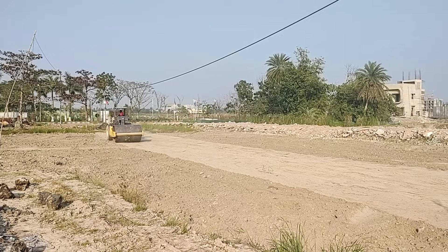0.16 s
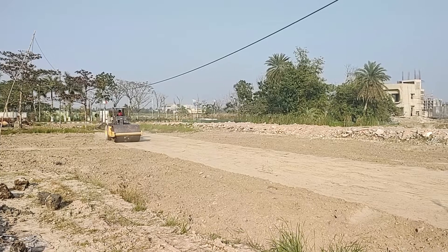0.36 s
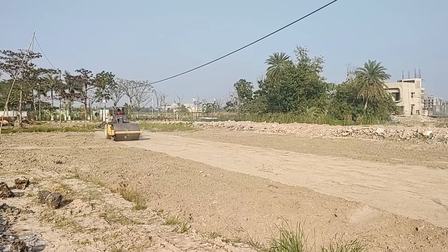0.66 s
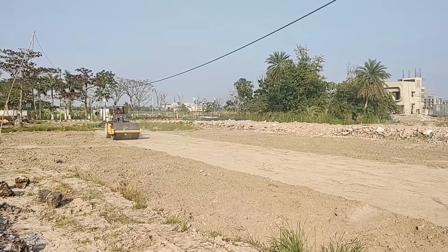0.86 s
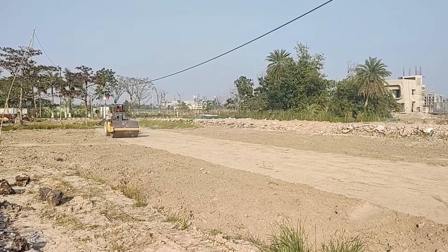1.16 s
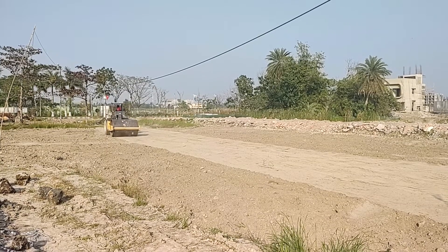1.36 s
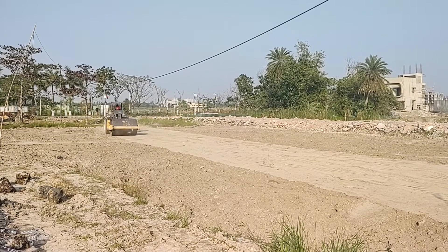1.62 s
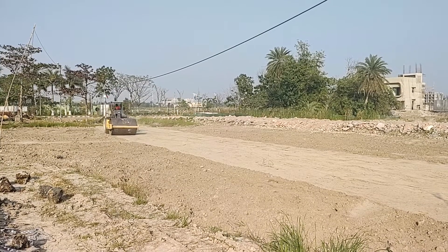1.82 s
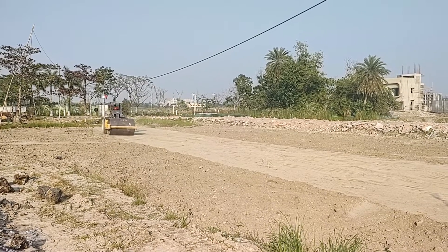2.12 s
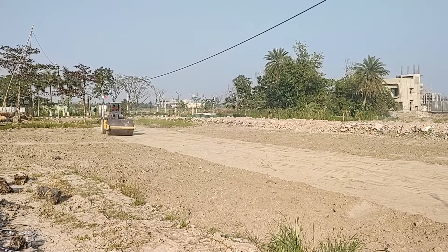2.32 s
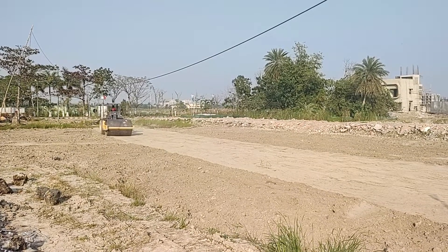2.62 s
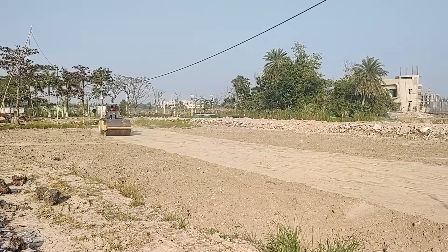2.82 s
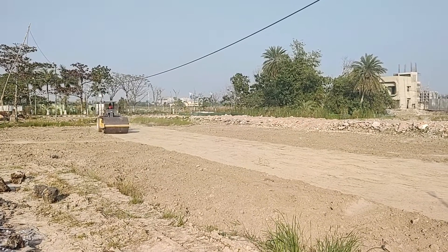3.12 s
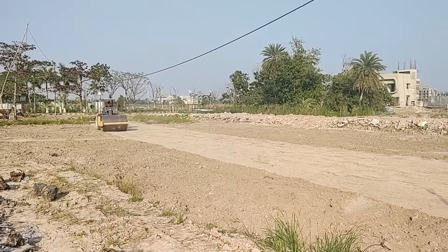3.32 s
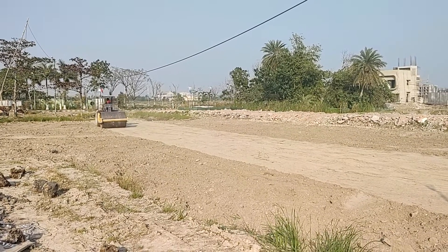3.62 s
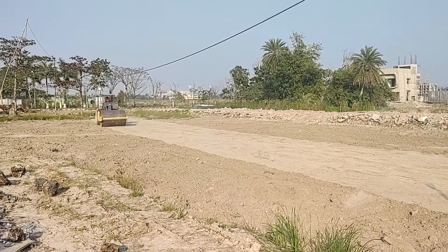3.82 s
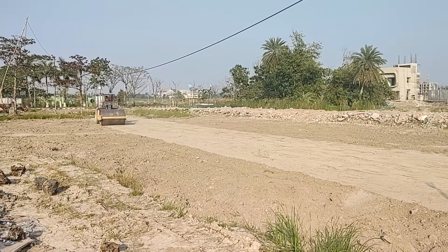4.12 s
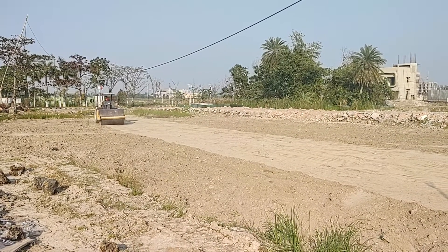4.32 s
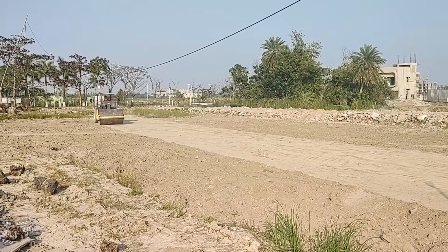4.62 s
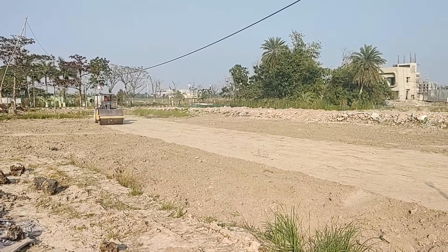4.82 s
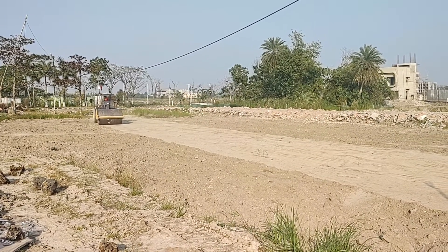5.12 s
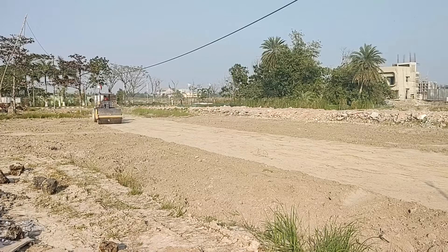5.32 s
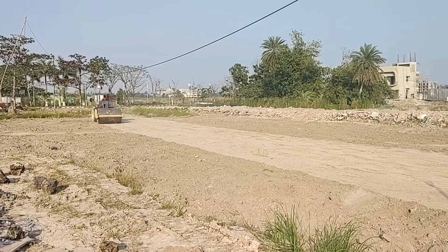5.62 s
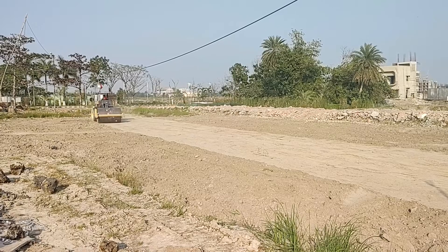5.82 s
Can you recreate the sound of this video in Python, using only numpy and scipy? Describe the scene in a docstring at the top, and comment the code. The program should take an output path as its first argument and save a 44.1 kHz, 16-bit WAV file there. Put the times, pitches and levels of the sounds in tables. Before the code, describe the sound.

A distant diesel road roller drones steadily on open ground, its low hum swelling and fading, with soft wind thumps and one dull metal clank.

```python
"""On open ground, some way off, a six-cylinder diesel road roller works at a nearly steady speed.
Its firing note, a sine at six pulses a cycle, swells and fades over a drone of the other cycle partials.
Filtered noise gives block knock and rattle in step with the cylinders, and fan hiss.
A metal clank of three blows rings in decaying modes with a noise crash.
Light wind rumbles as filtered noise and thumps as short swings, over a faint noise bed of open land."""
import sys
import numpy as np
from scipy import signal
from scipy.fft import rfft, irfft, next_fast_len
from scipy.io import wavfile
from scipy.ndimage import uniform_filter1d

SR = 44100
rng = np.random.default_rng(int(sys.argv[2]) if len(sys.argv) > 2 else 0)


def store_wav(level_fs):
    """Save 16-bit WAV to argv[1]."""
    pcm = np.round(np.clip(np.atleast_2d(level_fs), -1, 1) * 32767)
    wavfile.write(sys.argv[1], SR, pcm.T.astype(np.int16))


N = 262836
T = np.arange(N) / SR  # time in seconds
CYLINDERS = 6


def undb(db):
    """Level law: decibels to amplitude gain."""
    return 10 ** (np.asarray(db) / 20)


def curve(rows):
    """Linear interpolation: the columns of a table, joined by straight lines in time."""
    seconds, *columns = np.transpose(rows)
    return [np.interp(T, seconds, column) for column in columns]


def unit(x):
    """Normalisation: scale to a standard deviation of 1."""
    return x / np.std(x)


def colour(x, points):
    """Spectral shaping: filter by an outline of (Hz, dB) points, then scale to unit level."""
    hz, db = np.transpose(points)
    size = next_fast_len(N + SR // 10)
    f = np.maximum(np.arange(size // 2 + 1) * SR / size, 1)
    # beyond the end points the gain falls by 12 dB an octave
    outside = np.minimum(f / hz[0], 1) * np.minimum(hz[-1] / f, 1)
    gain = undb(np.interp(np.log(f), np.log(hz), db)) * outside ** 2
    return unit(irfft(rfft(x, size) * gain, size)[:N])


def walk(rate):
    """Band-limited fluctuation: smooth chance of spread 1, with rate new values a second."""
    knots = rng.standard_normal(1024)
    joined = np.interp(T * rate, np.arange(len(knots)), knots)
    return unit(uniform_filter1d(joined, int(SR / rate / 2)))


# Spectrum of the open ground far around. Each row: frequency in Hz, relative level in dB.
FIELD_SPECTRUM = [(20, -16), (42, -10.5), (62, 3), (200, -4), (450, -9.5), (580, -11), (900, -4),
                  (3000, -15), (8000, -51)]


def field():
    """Diffuse background: distant sound merges into coloured noise of slowly wavering level."""
    return colour(rng.standard_normal(N), FIELD_SPECTRUM) * undb(-59 + walk(2))


# Light breeze on the microphone: middle level and waver.
BREEZE_DB, BREEZE_WAVER_DB = -55, 1
# Short gust around each buffet: level relative to the buffet, Gaussian spread, delay.
GUST_DB, GUST_S, GUST_LAG_S = -17.5, .045, 0.021
# Colour of the eddies. Each row: frequency in Hz, relative level in dB.
EDDY_SPECTRUM = [(25, -32), (44, -24.5), (62, -3.5), (90, 3), (150, -0.5), (200, -0.5), (280, -21.5),
                 (500, -33.5)]
# Single buffets. Each row: time in seconds, envelope peak in dB, pitch in Hz.
WIND_BUFFETS = [(0.137, -27.5, 137), (.391, -26.5, 110), (.436, -33, 160), (0.553, -32, 165),
                (0.58, -30, 135), (.629, -30, 125), (1.029, -35, 120), (1.159, -32.5, 105),
                (1.227, -37, 170), (2.479, -42, 111), (2.975, -32, 133), (3.728, -29, 140),
                (4.402, -29.5, 142.9), (4.433, -40, 150), (4.459, -36.5, 171)]


def wind(swings):
    """Turbulent pressure: eddies rumble, louder around buffets that push the membrane in and let it swing back."""
    power = undb(BREEZE_DB + BREEZE_WAVER_DB * walk(2.8)) ** 2
    thumps = 0
    for s, db, hz in WIND_BUFFETS:
        gust = np.exp(-.5 * ((T - s - GUST_LAG_S) / GUST_S) ** 2)
        power = power + undb(db + GUST_DB) ** 2 * gust
        # swings is the Gaussian spread of a buffet, in turns of its pitch
        turn = hz * (T - s) - swings
        envelope = undb(db) * np.exp(-.5 * (turn / swings) ** 2)
        thumps = thumps - envelope * np.sin(2 * np.pi * turn)
    eddies = colour(rng.standard_normal(N), EDDY_SPECTRUM)
    return thumps + eddies * np.sqrt(power) * undb(1.2 * walk(16))


# Strike and rebounds of a steel part. Each row: time in seconds, level in dB.
CLANK_BLOWS = [(3.757, -34.5), (3.79, -45), (3.824, -48)]
# Modes of the steel. Each row: frequency in Hz, relative level in dB, time to fall by 60 dB in seconds.
STEEL_MODES = [(412, -13.5, .2), (460, -13, 0.26), (522, -15, 1), (600, -16, .16), (740, -10, 0.71),
               (810, 0, .06), (897, 2.5, 0.06), (913, 1, .06)]


def clank(crash_db, crash_s, echo_db, echo_s):
    """Modal decay: each blow rings the steel and throws a dull crash, which trees and walls scatter back."""
    out = np.zeros(N)
    crash_spectrum = [(250, -15.0), (420, -1), (620, -1.5), (900, -3.5), (1050, -6), (1500, -31)]  # Hz, dB
    crash = colour(rng.standard_normal(N), crash_spectrum)
    for s, db in CLANK_BLOWS:
        t = np.maximum(T - s, 0)
        ring = 0
        for hz, mode_db, t60 in STEEL_MODES:
            ring = ring + undb(mode_db - 60 * t / t60) * np.sin(2 * np.pi * (hz * t + rng.random()))
        spray = undb(crash_db) * np.exp(-t / crash_s) + undb(echo_db) * np.exp(-t / echo_s)
        onset = 1 - np.exp(-t / 0.0013)
        out += undb(db) * onset * (ring + spray * crash)
    return out


def strokes(cycle, cylinder_db, decay, scatter_db):
    """Periodic excitation: each cylinder has its own strength and fades with a time constant of decay firing gaps."""
    count, since = np.divmod(cycle * CYLINDERS, 1)
    count = count.astype(int)
    chance = rng.standard_normal(1024)
    strength_db = np.array(cylinder_db)[count % CYLINDERS] + scatter_db * chance[count]
    gate = undb(strength_db) * np.exp(-since / decay)
    return gate / np.sqrt(np.mean(gate ** 2))


def clatter(cycle, repeat):
    """Partly periodic noise: a grain of which the power share repeat comes back alike on every cycle."""
    size = 1024
    pattern = signal.resample(rng.standard_normal(size), 8 * size)
    alike = unit(np.interp(cycle % 1, np.arange(len(pattern)) / len(pattern), pattern))
    share = np.clip(repeat, 0, 1)
    return np.sqrt(share) * alike + np.sqrt(1 - share) * rng.standard_normal(N)


FAN_DB, FAN_WAVER_DB = -61, 1.02
# Spectrum of the cooling fan. Each row: frequency in Hz, relative level in dB.
FAN_SPECTRUM = [(700, 4), (1300, 3.5), (1600, 10), (2500, 5), (3400, -7.5), (3780, 1), (3980, -4),
                (4230, 0), (4720, 1.5), (5000, -4.5), (5600, -4.5), (6100, -13.5), (7500, -10.5),
                (8100, -32.5)]


def fan(cycle):
    """Flow noise: the cooling fan hisses, slightly alike from cycle to cycle, at a wavering level."""
    hiss = colour(clatter(cycle, repeat=0.086), FAN_SPECTRUM)
    return hiss * undb(FAN_DB + FAN_WAVER_DB * walk(2.5))


# Level at the start, swell with the exhaust note in dB per dB, and slow fade.
RATTLE_DB, RATTLE_FOLLOWS, RATTLE_FADE_DB_PER_S = -54, .16, 0.34
# Spectrum of injectors and valves. Each row: frequency in Hz, relative level in dB.
RATTLE_SPECTRUM = [(1000, -15.5), (1330, -9.5), (1500, 4), (1800, -0.5), (2150, -1.5), (2430, -3.5),
                   (2600, -2.5), (2790, -3.5), (2930, -12.5), (3060, -9), (3220, -15), (3360, -28)]


def top_end(cycle, swell_db):
    """Impact noise: many small metal contacts of injectors and valves, gated by the firings."""
    gate = strokes(cycle, [0.56, 0.03, 0.9, -0.92, 0.45, 0.14], decay=2.6, scatter_db=.5)
    rattle = colour(clatter(cycle, repeat=.35) * gate, RATTLE_SPECTRUM)
    return rattle * undb(RATTLE_DB + RATTLE_FOLLOWS * swell_db - RATTLE_FADE_DB_PER_S * T)


KNOCK_DB = -53
# Ring of the block under uneven combustion. Each row: frequency in Hz, relative level in dB.
BLOCK_SPECTRUM = [(200, -10), (330, -7.5), (430, -12.5), (510, -12.5), (580, -21), (680, -7.5), (800, -3),
                  (950, -5), (1100, -7), (1300, -11), (1600, -33)]


def block_knock(cycle):
    """Forced resonance: noise bursts in step with the cylinders take on the ring of the block."""
    gate = strokes(cycle, [2.0, -2.8, 0, -0.9, 0.9, -1.0], decay=4.5, scatter_db=.5)
    return colour(clatter(cycle, repeat=0.084) * gate, BLOCK_SPECTRUM) * undb(KNOCK_DB)


# Partials of the engine cycle (two crank turns); the firing partial is left to the exhaust.
# Each row: multiple of the cycle rate, relative level in dB.
CYCLE_PARTIALS = [(1, -36.5), (2, -40.5), (3, -14), (4, -17), (5, -16), (6, 0), (7, -21), (8, -28.5),
                  (9, -17), (10, -30.5), (11, -29.5), (12, -16.5), (13, -26.5), (14, -16), (15, -30.5),
                  (16, -20), (17, -24), (18, -25.5), (19, -20.5), (20, -28.5), (21, -33.5), (22, -26.5),
                  (23, -31.5), (24, -25.5), (25, -28.5), (26, -37), (27, -43.5), (28, -34), (29, -35.5),
                  (30, -43), (31, -27), (32, -25), (33, -25), (34, -31), (35, -22.5), (36, -24), (37, -17),
                  (38, -25.5), (39, -17.5), (40, -21), (41, -27), (42, -18.5), (43, -22.5), (44, -20),
                  (45, -20.5), (46, -23.5), (47, -23.5), (48, -24), (49, -23.5), (50, -24), (51, -19),
                  (52, -34.5), (53, -27.5), (54, -22), (55, -34.5), (56, -32)]


def drone(cycle, low_db, high_db, waver_db, flicker_db, spread):
    """Fourier series: unequal cylinders fill in partials that form one chug a cycle and waver in the moving air."""
    out = 0
    for k, db in CYCLE_PARTIALS:
        if k == CYLINDERS:
            continue
        height = k / len(CYCLE_PARTIALS)
        tilt_db = low_db + (high_db - low_db) * height
        gain = undb(db + tilt_db + waver_db * walk(2.49) + flicker_db * walk(11))
        # bending waves in steel run faster at high pitch, so each chug sweeps downward
        lag = spread * np.sqrt(k)
        # the lows arrive by many paths, and the paths shift as the roller moves
        lag = lag + .3 * (1 - height) * rng.standard_normal() + .09 * walk(1.5)
        out = out + np.sqrt(2) * gain * np.cos(2 * np.pi * (k * cycle - lag))
    return out


def exhaust(cycle, level_db, flutter_db):
    """Low-pass smoothing: six pulses a cycle, rounded to a sine by the silencer."""
    gain = np.sqrt(2) * undb(level_db + flutter_db * walk(14))
    return gain * np.sin(2 * np.pi * CYLINDERS * cycle)


# Firing rate, and its slow hunting and fast jitter as shares of that rate.
FIRING_HZ = 124.53
HUNT, HUNTS_PER_S, JITTER = .002, 2.5, 0.001997
# Drone and knock: chance in the chug level, swell with the exhaust in dB per dB, slow fade.
CHUG_SCATTER_DB, BLOCK_FOLLOWS, BLOCK_FADE_DB_PER_S = 0.75, 0.18, 0.11
# Firing note of the exhaust. Each row: time in seconds, level in dB.
FIRING_NOTE = [(0.0, -39.5), (0.5, -40.5), (0.6, -37.0), (1.05, -38), (1.1, -41), (1.8, -46.7),
               (2.6, -40.5), (2.85, -43.5), (3.35, -37.5), (3.75, -38.1), (4.25, -49), (4.65, -51.5),
               (4.8, -41), (5.2, -38.5), (5.35, -45.1), (5.95, -41.5)]


def engine():
    """Phase locking: one crank turns the exhaust note, drone, block knock, top-end rattle and fan."""
    firing_hz = FIRING_HZ * (1 + HUNT * walk(HUNTS_PER_S) + JITTER * walk(18))
    cycle = np.cumsum(firing_hz) / CYLINDERS / SR
    note_db, = curve(FIRING_NOTE)
    swell_db = note_db - note_db.mean()
    body = drone(cycle, low_db=-41.5, high_db=-43.0, waver_db=1.13, flicker_db=1.2, spread=18)
    chugs = body * undb(CHUG_SCATTER_DB * walk(21))
    block_db = BLOCK_FOLLOWS * swell_db - BLOCK_FADE_DB_PER_S * (T - T.mean())
    block = (chugs + block_knock(cycle)) * undb(block_db)
    return exhaust(cycle, note_db, flutter_db=0.2) + block + top_end(cycle, swell_db) + fan(cycle)


def scene():
    """Superposition: the quiet land, the wind and the roller with its clank add up."""
    roller = engine() + clank(crash_db=1, crash_s=0.0063, echo_db=-19.5, echo_s=0.11)
    return (field() + wind(swings=0.44) + roller)[None]


def record(dry):
    """Band limiting: the microphone sheds the bass below 40 Hz and the top is cut above 8 kHz."""
    thin = signal.sosfilt(signal.butter(3, 40, "high", fs=SR, output="sos"), dry)
    return signal.sosfilt(signal.ellip(8, .2, 70, 8000, fs=SR, output="sos"), thin)


dry = scene()
out = record(dry)
store_wav(out)
```